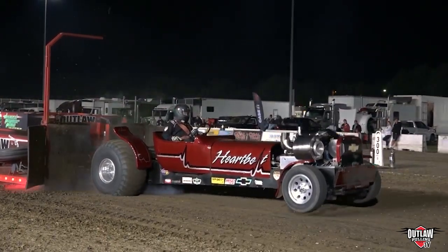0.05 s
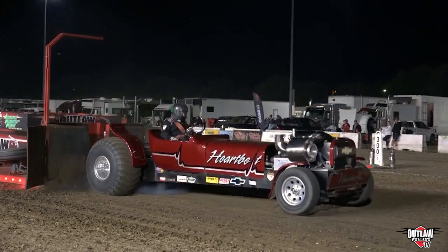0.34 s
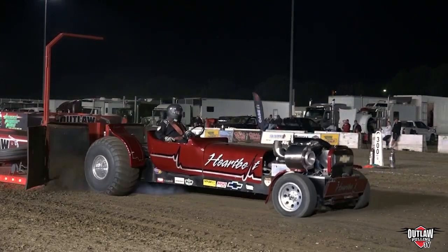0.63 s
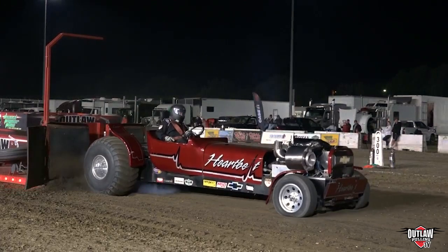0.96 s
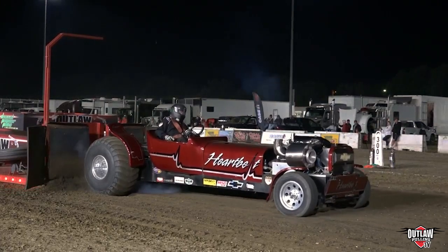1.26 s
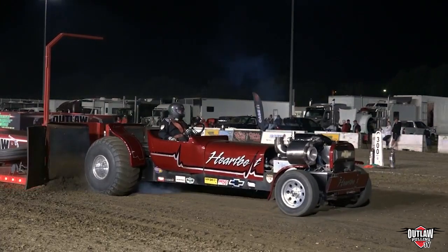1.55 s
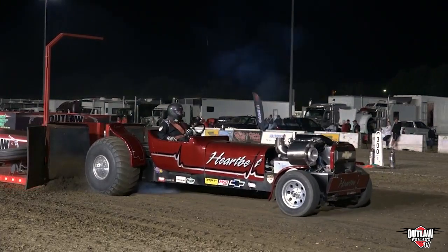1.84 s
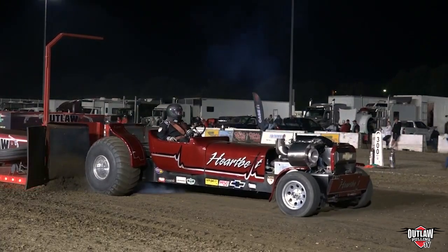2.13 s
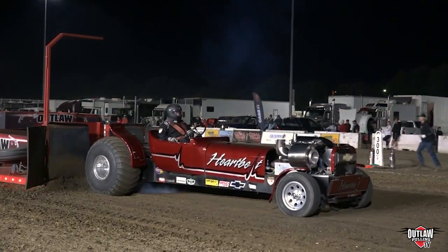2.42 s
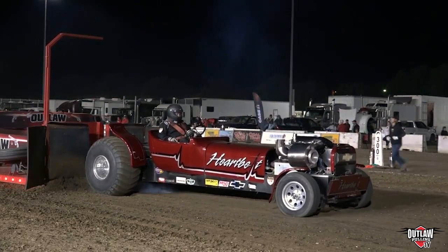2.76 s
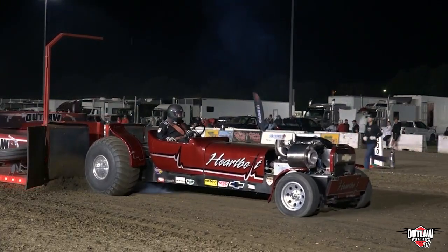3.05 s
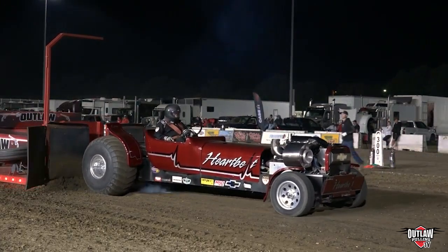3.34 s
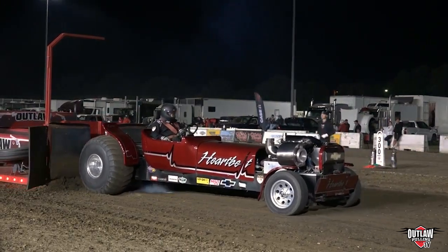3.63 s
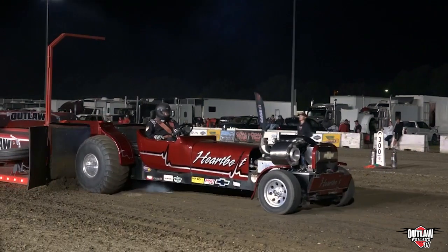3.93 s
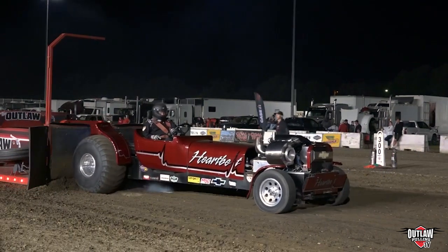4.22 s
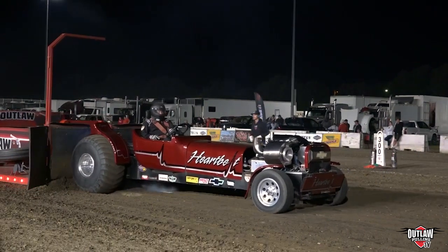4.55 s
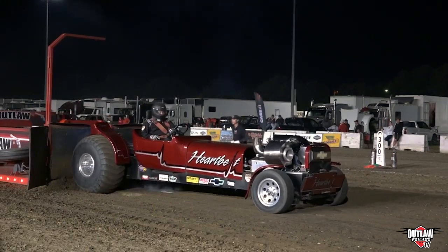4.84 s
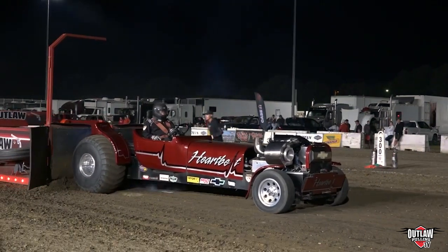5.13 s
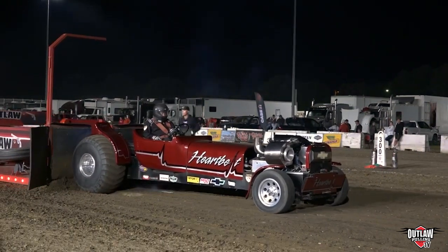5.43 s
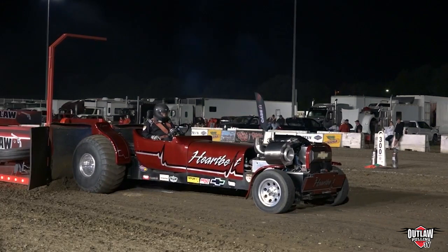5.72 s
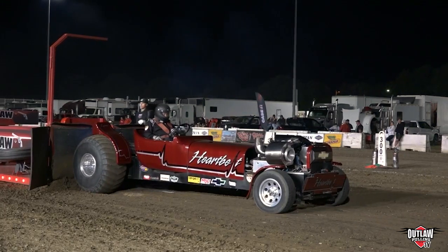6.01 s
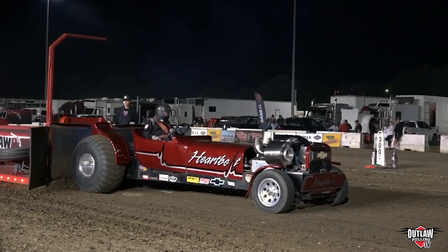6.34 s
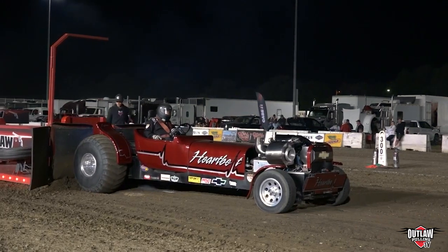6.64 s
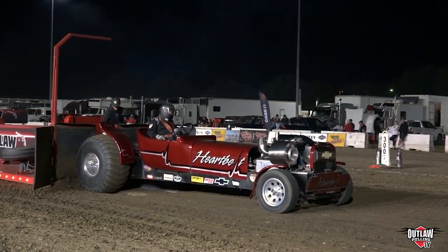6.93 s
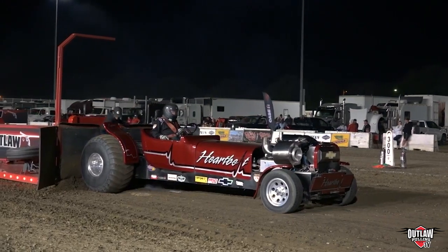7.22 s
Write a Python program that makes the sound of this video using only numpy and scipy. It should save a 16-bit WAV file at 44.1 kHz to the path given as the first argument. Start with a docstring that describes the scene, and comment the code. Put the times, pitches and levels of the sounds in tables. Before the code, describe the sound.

Turbo air hisses and whistles down as a big truck engine coasts, blipping sharply and popping through open exhaust pipes.

```python
"""A turbocharged V8 pulling truck comes off full power at the end of a pull on an open dirt track.
First the boost air rushes out, and a stab of throttle cracks through the hiss. Then the turbo
whistles down while the engine coasts with a lumpy throb. More short stabs, most kicking the revs up,
make the open pipes bark, spit and pop with unburnt fuel. The engine sinks to a slow lope before
a last run of stabs. Far engines rumble underneath throughout."""
import sys
import numpy as np
from scipy import signal
from scipy.fft import rfft, irfft, next_fast_len
from scipy.io import wavfile
from scipy.ndimage import uniform_filter1d, map_coordinates

SR = 44100
rng = np.random.default_rng(int(sys.argv[2]) if len(sys.argv) > 2 else 0)


def write(x):
    x = np.atleast_2d(x).T
    wavfile.write(sys.argv[1], SR, np.round(np.clip(x, -1, 1) * 32767).astype(np.int16))


N = 320591
TIME = np.arange(N) / SR
REFERENCE_HZ = 20  # engine speeds are four-stroke cycles a second, eight firings to a cycle

# Stabs of throttle. Each row: start and end in seconds, engine speed reached in Hz,
# relative bark level in dB, relative level of spitting gas in dB.
STABS = [(0.35, 0.476, 31.8, -22, -32), (1.57, 1.734, 26.3, -23, -23.5), (2.041, 2.184, 27, -25, -27),
         (2.654, 2.69, 18, -29.5, -47), (2.747, 2.795, 19, -28.5, -46), (2.82, 3.057, 20.3, -26.5, -28.5),
         (3.27, 3.421, 20.3, -24.5, -23), (3.627, 3.747, 23.1, -24, -27), (5.2, 5.376, 11.6, -35.5, -40),
         (5.523, 5.63, 14.8, -28.5, -30.5), (5.918, 6.138, 19.9, -28.5, -30.5),
         (6.291, 6.477, 22, -27, -27.5), (6.904, 7.045, 17.5, -29.5, -33.5)]

def throttle(ramp_s=0.0022, release_s=0.05, build_db=4):
    """Engine load and gas flow: both build during each stab and are zero with the throttle shut."""
    load, gas = 0, 0
    for start, end, _, bark_db, gas_db in STABS:
        gate = np.clip(np.minimum((TIME - start) / ramp_s, (end - TIME) / release_s) + .5, 0, 1)
        build = np.clip(2 * (TIME - start) / (end - start), 0, 1)
        gate *= undb(build_db * (build - 2))
        load += gate * undb(bark_db)
        gas += gate * undb(gas_db)
    return load, gas


def engine_speed(start_hz=26.76, drag_per_s=0.62):
    """Stabs slide the revs to a new speed, nearly always up; in between, they sink steadily."""
    hz = start_hz * np.exp(-drag_per_s * TIME)
    for start, end, reached_hz, _, _ in STABS:
        slide = np.interp(TIME, [start, end], [np.interp(start, TIME, hz), reached_hz])
        run_down = np.exp(-drag_per_s * np.maximum(TIME - end, 0))
        hz = np.where(TIME < start, hz, slide * run_down)
    return hz


# Tone of the pipe's bark and of its spitting gas. Each row: frequency in Hz, gain in dB.
BARK_EQ = [(30, -21), (60, -20), (110, 4), (200, 6), (320, 2.5), (440, -14.5), (600, 5.5), (950, 8),
           (1200, -2), (1500, -13), (2000, -3.5), (2500, -10.5), (3100, -2.5), (5000, -28.5)]
SPIT_EQ = [(1200, -20), (2000, -4.5), (3100, -1.5), (3900, 7.5), (6000, 3), (9000, 2.5), (11500, -4.5),
           (14000, -13), (15800, -42)]

def open_pipe(bangs, jets, turbulence, ragged_s=0.002, jet_s=0.0017, jet_delay_s=0.0023):
    """A firing slams the open pipe with a ragged pressure pulse; a jet of gas spits just after it."""
    pressure = bangs + turbulence * puff(bangs, ragged_s) * noise()
    spit = np.sqrt(puff(jets ** 2, jet_s, jet_delay_s)) * unit(colour(noise(), SPIT_EQ))
    return colour(pressure, BARK_EQ), spit


def firings(cycle, load, gas, jitter_s=0.00046, bank_db=3, bark_db=7, ring_db=-10, spit_db=-1):
    """Under throttle, eight very uneven firings a cycle bark out; the nearer cylinder bank is louder."""
    times = np.flatnonzero(np.diff(np.floor(8 * cycle))) / SR
    near_bank = np.resize([1, 0, 0, 1, 0, 1, 1, 0], len(times))
    time_scatter, bang_scatter, spit_scatter = rng.standard_normal((len(times), 3)).T
    times = times + jitter_s * time_scatter
    bang_size = undb(bank_db * near_bank + 2.5 * np.clip(bang_scatter, -2, 1))
    spit_size = bang_size * undb(5 * np.minimum(spit_scatter, 1.6))
    bangs = strikes(times, bang_size)
    bark, spit = open_pipe(bangs, strikes(times, spit_size), turbulence=0.1)
    # a cross mode of the pipe gives each firing a metallic edge
    ring = puff(bangs, rise_s=0.0051) * band(hz=3050, width_hz=550)
    # the throttle sets the power, however many firings share it
    bark, spit, ring = (even_out(x, SR // 20) for x in (bark, spit, ring))
    # a cylinder misses just before each pop and leaves its fuel in the pipe
    pop_marks = strikes(np.transpose(FUEL_POPS)[0], np.ones(len(FUEL_POPS)))
    misfire_dip = 1 - .65 * puff(pop_marks[::-1], rise_s=.004)[::-1]
    return misfire_dip * (load * (undb(bark_db) * bark + undb(ring_db) * ring) + undb(spit_db) * gas * spit)


# Hard single bangs. Each row: start in seconds, bang level in dB, gas jet level in dB.
FUEL_POPS = [(0.395, -3, -18), (1.682, -6, -21.5), (2.106, -6.5, -26), (2.655, -21, -42), (2.748, -18, -40),
             (2.821, -21, -46), (2.896, -10.5, -49), (2.928, -9, -23), (3.331, -7, -26), (3.38, -12, -27),
             (3.444, -13.5, -30.5), (3.684, -14, -21), (3.73, -14, -21.5), (3.775, -14.5, -34),
             (5.646, -13, -35.5), (6.055, -9, -40), (6.09, -9, -23.5), (6.142, -12.5, -36),
             (6.336, -13, -35), (6.369, -11, -22.5), (6.439, -19, -37), (6.967, -27, -37)]

def backfires(crack_db=7, crack_gas_db=-7.5):
    """Pockets of unburnt fuel go off in the pipes, and one cracks as each stab opens."""
    cracks = [(start, db + crack_db, gas_db + crack_gas_db) for start, _, _, db, gas_db in STABS]
    times, bang_db, jet_db = np.transpose(list(FUEL_POPS) + cracks)
    pipe_peak = np.abs(colour(signal.unit_impulse(N), BARK_EQ)).max()
    bangs = strikes(times, undb(bang_db) / pipe_peak)
    bark, spit = open_pipe(bangs, strikes(times, undb(jet_db)), turbulence=0.089)
    return bark + spit


# Partials of the throb. Each row: multiple of the cycle rate, relative level in dB.
THROB_PARTIALS = [(3, 6.5), (4, -15), (5, -2), (6, -9), (7, 1), (8, -6), (9, -4), (10, -8), (11, 2),
                  (13, -1.5)]
# Low body of the pipes. Each row: frequency in Hz, gain in dB.
THROB_EQ = [(35, -45.5), (60, -25.5), (90, -10.5), (130, -1.5), (200, 4.5), (260, -1.5), (320, -10),
            (450, -18.5)]
# The coasting throb grows with the revs. Each row: engine speed in Hz, level in dB.
THROB_BY_SPEED = [(9, -51), (12, -50.5), (15, -38), (20, -33.5), (25, -30.5), (32, -22)]

def throb(hz, cycle, load, muffle_db=-8, lug_octave_db=4.5, load_db=-4, boom_db=1, boom_hz=130):
    """Unevenly spaced pulses of each cylinder bank hum in the pipes; under load a resonance booms."""
    hum = sum(undb(db + 2.2 * walk(7)) * np.cos(2 * np.pi * order * cycle - .3 * order ** 2)
              for order, db in THROB_PARTIALS)
    hum = even_out(colour(hum, THROB_EQ), SR // 5)
    # the racing turbine softens the throb until the first stab
    coast_db = np.interp(hz, *np.transpose(THROB_BY_SPEED)) + muffle_db * (TIME < STABS[0][0])
    # below the reference speed a stab thumps harder
    thump = load * undb(lug_octave_db * np.maximum(np.log2(REFERENCE_HZ / hz), 0))
    fifth, eighth = (np.sqrt(2) * np.sin(2 * np.pi * order * cycle) * undb(3 * walk(70))
                     for order in (5, 8))
    resonance = signal.iirpeak(boom_hz, Q=3.3, fs=SR)
    boom = signal.lfilter(*resonance, thump * (fifth + undb(-2) * eighth))
    return hum * (undb(coast_db) + undb(load_db) * thump) + undb(boom_db) * boom


# Tone of the rushing boost air. Each row: frequency in Hz, gain in dB.
HISS_EQ = [(700, -12), (1150, -2.5), (1600, -5), (2250, 2), (3400, -1.5), (4800, -2), (5800, -2.5),
           (8000, -11.5), (10300, -13.5), (11500, -19), (13400, -21), (14500, -26), (15000, -27),
           (15800, -38)]

def boost_hiss(boost, octaves, base_db=-41.5, boost_db=21.5, octave_db=2.5, split_hz=7000, sizzle_s=1.87):
    """Boost air hisses through the turbo, quieter and duller as the pressure falls."""
    air = unit(colour(noise(), HISS_EQ))
    body = signal.sosfiltfilt(signal.butter(4, split_hz, fs=SR, output="sos"), air)
    sizzle = unit(air - body) * undb(-14 + 11 * np.exp(-TIME / sizzle_s))
    flutter_db = 0.71 * walk(130)
    return (unit(body) + sizzle) * undb(base_db + boost_db * boost + octave_db * octaves + flutter_db)


# Tone of the gravelly rasp. Each row: frequency in Hz, gain in dB.
RASP_EQ = [(40, -40.5), (180, 11.5), (310, 2.5), (440, -2.5), (620, 2.5), (1050, 1), (1500, -5),
           (2500, -28)]

def pipe_rasp(cycle, load, boost, octaves, base_db=-39.5, boost_db=11, octave_db=4, afterburn_s=0.08):
    """The pipes rasp in time with the pistons; fuel burns on in them after each stab."""
    pistons = 1 + .13 * (np.cos(2 * np.pi * 8 * cycle) + np.cos(2 * np.pi * cycle) / 2)
    decay = np.exp(-1 / (afterburn_s * SR))
    afterburn = undb(-6.5) * signal.lfilter([1 - decay], [1, -decay], load)
    flow = undb(base_db + boost_db * boost + octave_db * octaves)
    return unit(colour(noise() * pistons, RASP_EQ)) * (flow + afterburn)


# Falling whistles, each taking over from the last. Each row: start and swell time in seconds,
# opening pitch in Hz, rate of pitch sag per second, relative level in dB.
WHISTLE_GLIDES = [(.8, 0.49, 3037, .42, -33), (1.575, .015, 3855, .202, -33)]

def turbo_whistle(cycle, width_hz=260, fade_db_per_s=5, chirp_cycles=0.05):
    """The breathy whistle of the compressor swells, sinks and fades, chirping once an engine cycle."""
    hz, gain = np.zeros(N), np.zeros(N)
    for start, swell_s, pitch_hz, sag, db in WHISTLE_GLIDES:
        age = TIME - start
        hz = np.where(age < 0, hz, pitch_hz * np.exp(-sag * age))
        gain = np.where(age < 0, gain, np.minimum(age / swell_s, 1) * undb(db - fade_db_per_s * age))
    chirp = 1 + np.exp(-((cycle % 1 - .5) / chirp_cycles) ** 2 / 2)
    whistle = unit(band(hz, width_hz) + .8 * band(hz, 3 * width_hz))
    flutter = undb(walk(45))
    return whistle * gain * chirp * flutter


# Spurts of escaping boost. Each row: time of the peak and half length in seconds,
# centre and width in Hz, level in dB.
BOOST_JETS = [(0.075, 0.088, 9300, 1700, -25), (.08, 0.14, 5200, 1800, -25), (.21, 0.047, 13500, 1700, -26),
              (0.447, 0.27, 3490, 450, -27.5), (.565, 0.018, 7140, 250, -29), (.57, .12, 13300, 1300, -37),
              (0.593, 0.052, 5880, 450, -27), (1.133, 0.27, 4600, 3994, -29)]

def boost_dump():
    """Brief jets of air sing as the pressure is dumped."""
    return sum(band(hz, width_hz) * undb(db) * np.exp(-((TIME - peak_s) / half_s) ** 2 / 2)
               for peak_s, half_s, hz, width_hz, db in BOOST_JETS)


def track_echo(x, t60_s=0.38, gap_s=.015, wet_db=-19, dull_hz=3500):
    """Faint, dull scatter from the sled, trailers and stands, different at each ear."""
    t = TIME[:SR]
    tail = rng.standard_normal((2, SR)) * np.exp(-np.log(1000) * t / t60_s) * (t > gap_s)
    tail /= np.sqrt(np.sum(tail[0] ** 2))
    tail = signal.sosfilt(signal.butter(1, dull_hz, fs=SR, output="sos"), tail)
    return undb(wet_db) * signal.fftconvolve(x[None], tail, axes=1)[:, :N]


def far_engines():
    """Far engines and generators rumble under everything."""
    return undb(-58) * band(hz=90, width_hz=50)


def undb(db):
    """Decibels to gain."""
    return 10 ** (np.asarray(db) / 20)


def unit(x):
    """Scale to rms 1."""
    return x / np.sqrt(np.mean(x ** 2))


def even_out(x, window):
    """Hold the rms near 1 over a sliding window of samples."""
    return x / np.sqrt(uniform_filter1d(x ** 2, window) + 1e-12)


def colour(x, points):
    """Minimum-phase EQ through the given (Hz, dB) points."""
    size = next_fast_len(N + 8192)
    hz, db = np.transpose(points)
    f = np.maximum(np.fft.rfftfreq(2 * size, 1 / SR), 1)
    cepstrum = irfft(np.log(undb(np.interp(np.log(f), np.log(hz), db))))
    cepstrum[1:size] *= 2
    return irfft(rfft(x, 2 * size) * np.exp(rfft(cepstrum[:size], 2 * size)))[:N]


def noise():
    """White noise."""
    return rng.standard_normal(N)


def walk(rate_hz):
    """Smooth random wander, rms 1."""
    knots = noise()[:int(N * rate_hz / SR) + 2]
    return unit(map_coordinates(knots, [TIME * rate_hz], order=2, mode="nearest"))


def band(hz, width_hz):
    """Narrow noise around a centre that may move."""
    phase = 2 * np.pi * np.cumsum(hz * np.ones(N)) / SR
    return unit(walk(width_hz) * np.cos(phase) + walk(width_hz) * np.sin(phase))


def strikes(times, sizes):
    """Single-sample impulses."""
    return np.bincount(np.clip(times * SR, 0, N - 1).astype(int), sizes, N)


def puff(x, rise_s, delay_s=0):
    """Follow each impulse with a swell of the same height that dies away."""
    age = np.maximum(TIME[:SR // 10] - delay_s, 0) / rise_s
    return np.maximum(signal.fftconvolve(x, age * np.exp(1 - age))[:N], 0)


# Stereo balance, settling a little to the left. Each row: time in seconds, left minus right in dB.
BALANCE = [(0, -1), (.3, 4.5), (1.1, 5.5)]

def scene(bleed_s=2.77, bleed_shape=1.13):
    """Engine speed, throttle and fading boost drive the truck, set over its echo and the far rumble."""
    hz = engine_speed()
    cycle = np.cumsum(hz) / SR
    octaves = np.log2(hz / REFERENCE_HZ)
    load, gas = throttle()
    boost = np.exp(-(TIME / bleed_s) ** bleed_shape)  # bleeds away after the pull, slowly at first
    pipes = throb(hz, cycle, load) + firings(cycle, load, gas) + backfires()
    rush = boost_hiss(boost, octaves) + pipe_rasp(cycle, load, boost, octaves)
    truck = pipes + rush + turbo_whistle(cycle) + boost_dump()
    balance_db = np.interp(TIME, *np.transpose(BALANCE))
    sides = undb([balance_db / 2, -balance_db / 2])
    return (truck + track_echo(truck) + far_engines()) * sides / sides.mean(axis=0)


def record(dry):
    """Round off the highest peaks and cut the top above 15.8 kHz."""
    rounded = 1.5 * np.tanh(dry / 1.5)
    return signal.sosfilt(signal.ellip(10, .1, 80, 15800, fs=SR, output="sos"), rounded)


dry = scene()
out = record(dry)
write(out)
```